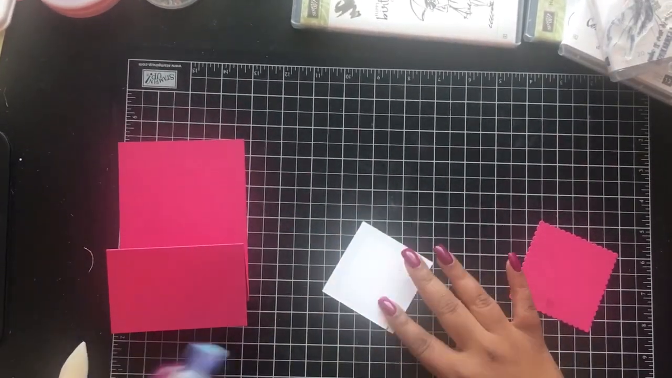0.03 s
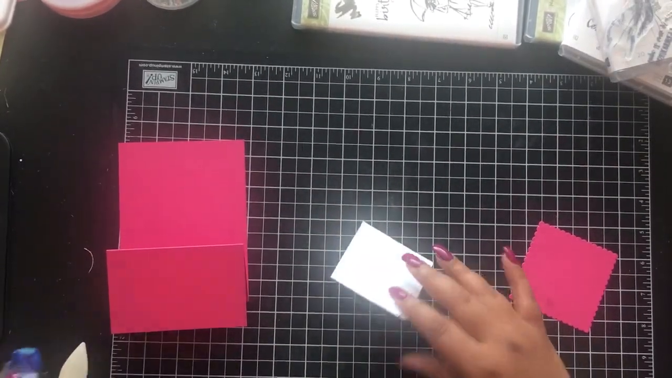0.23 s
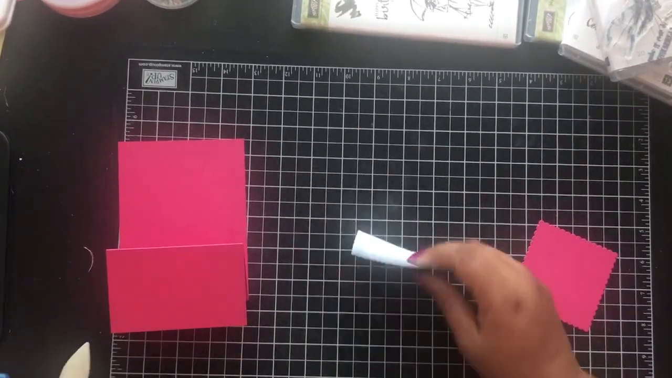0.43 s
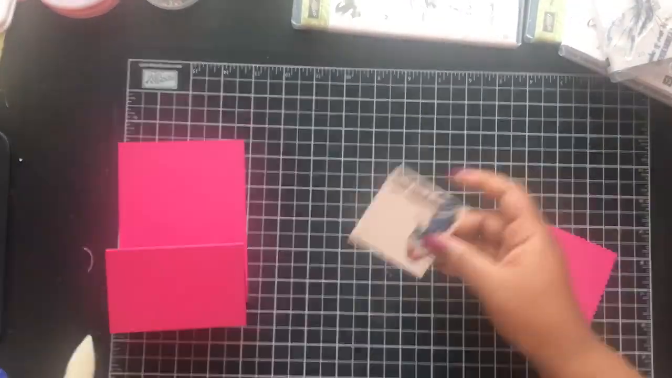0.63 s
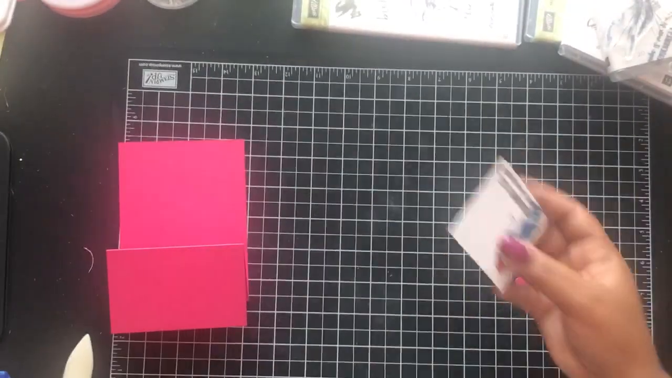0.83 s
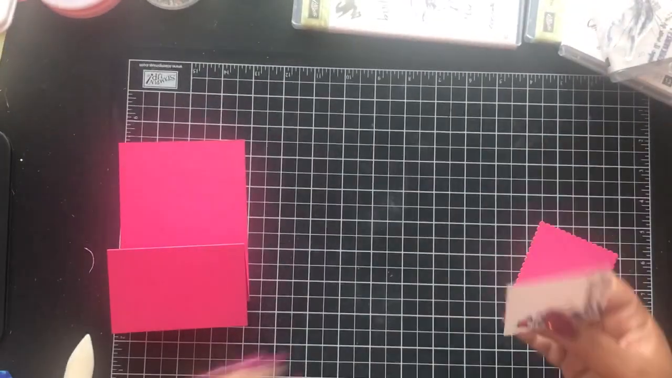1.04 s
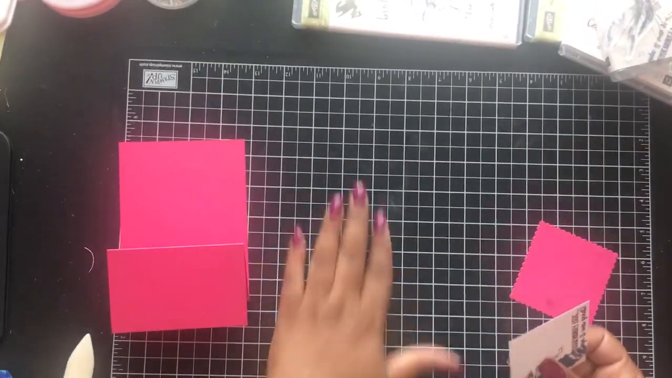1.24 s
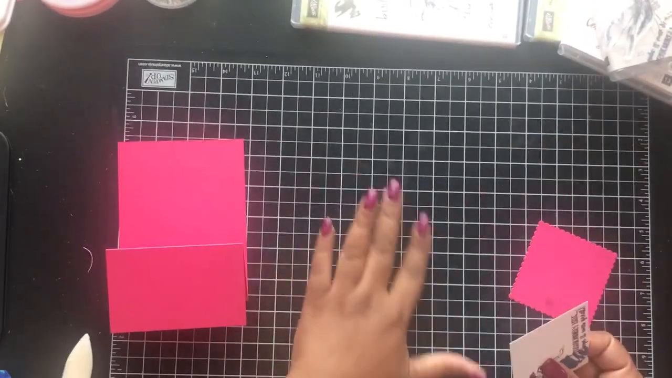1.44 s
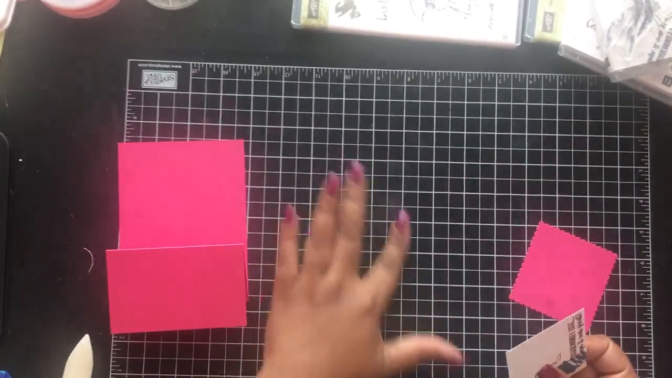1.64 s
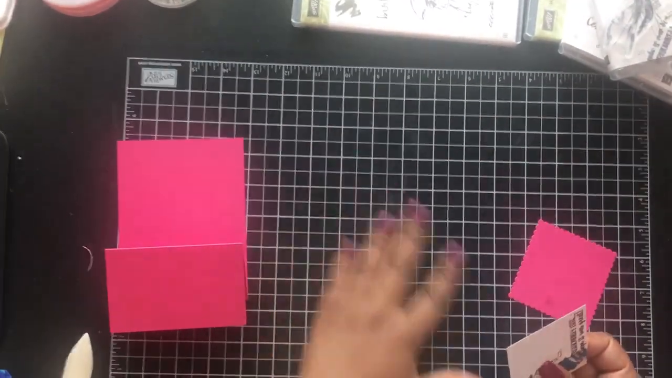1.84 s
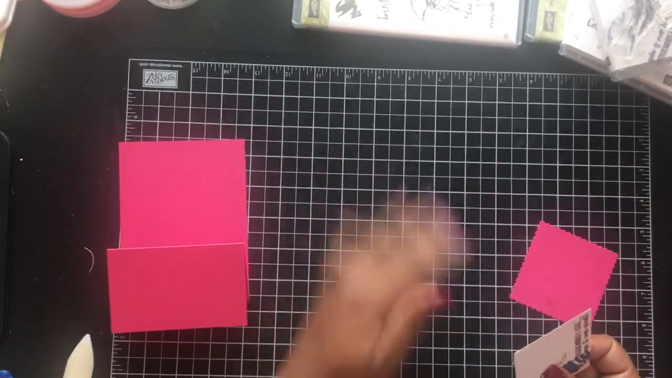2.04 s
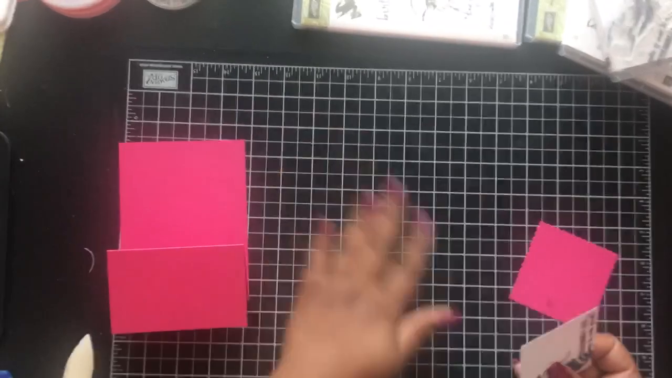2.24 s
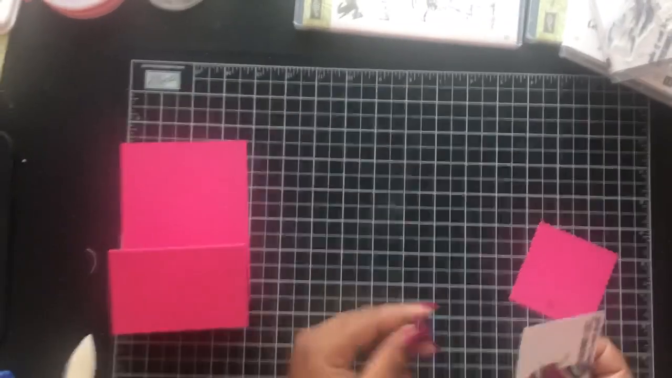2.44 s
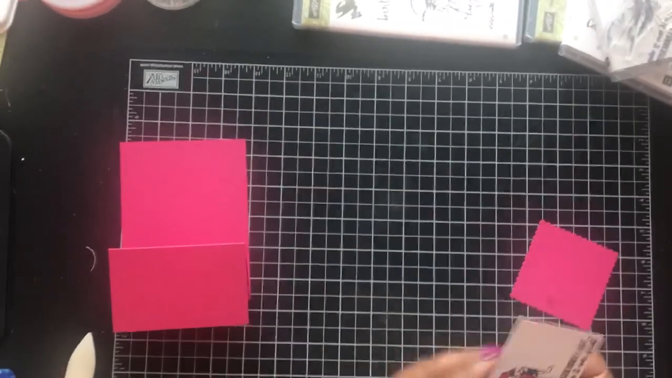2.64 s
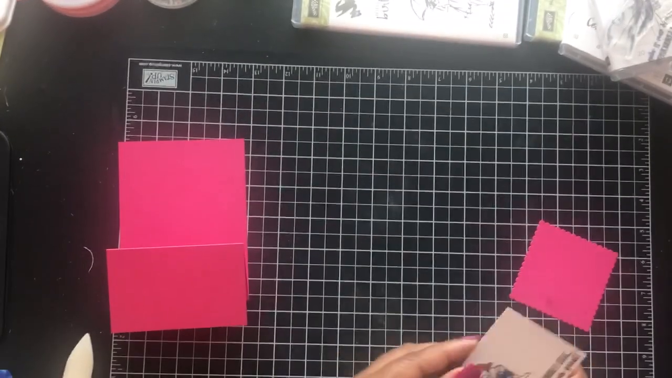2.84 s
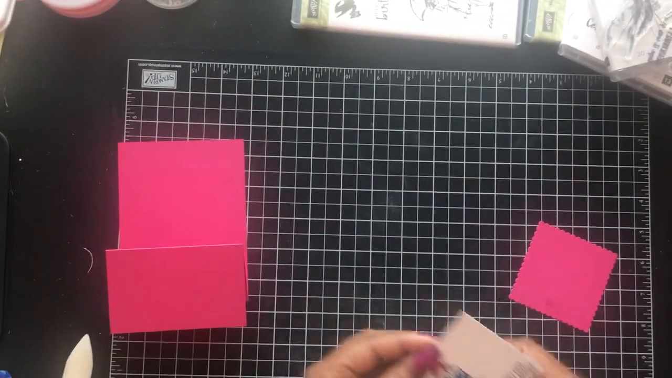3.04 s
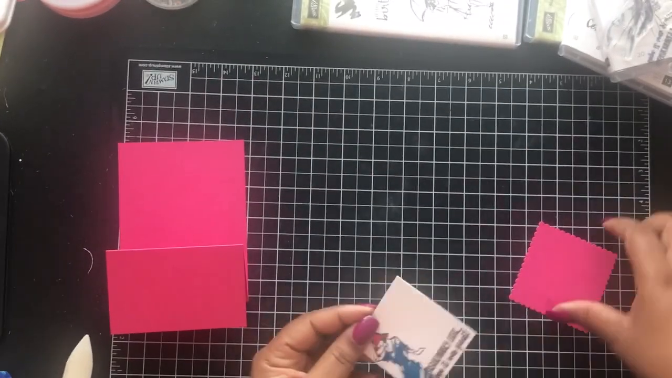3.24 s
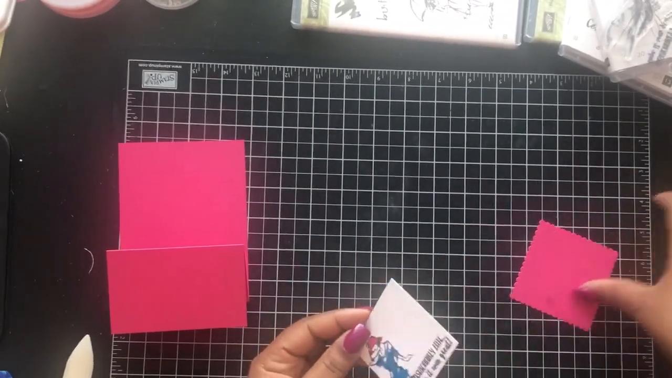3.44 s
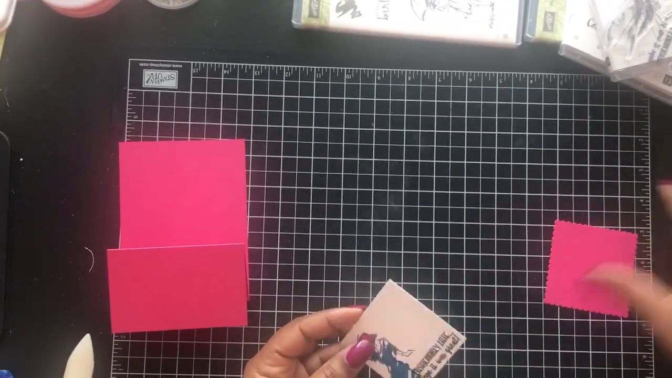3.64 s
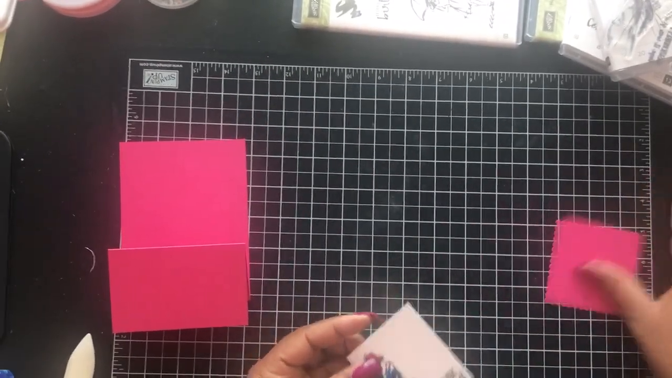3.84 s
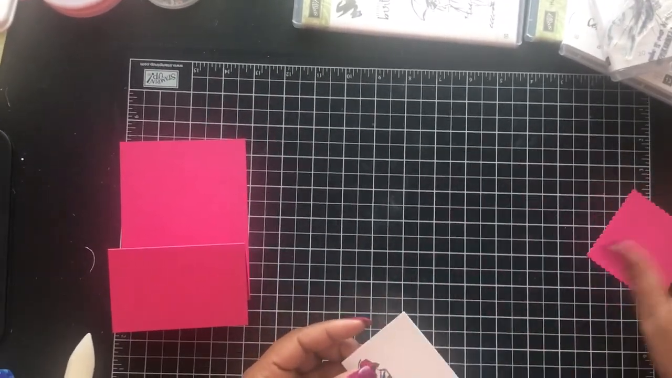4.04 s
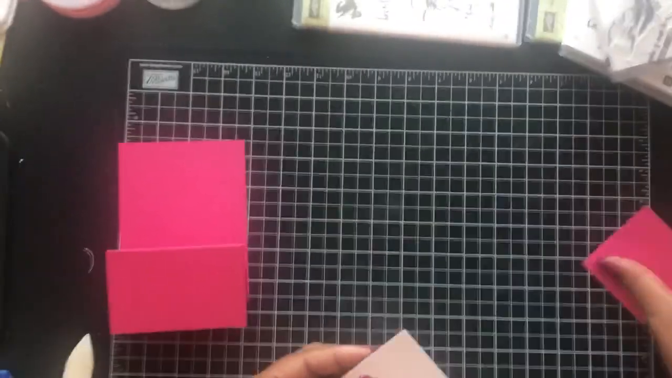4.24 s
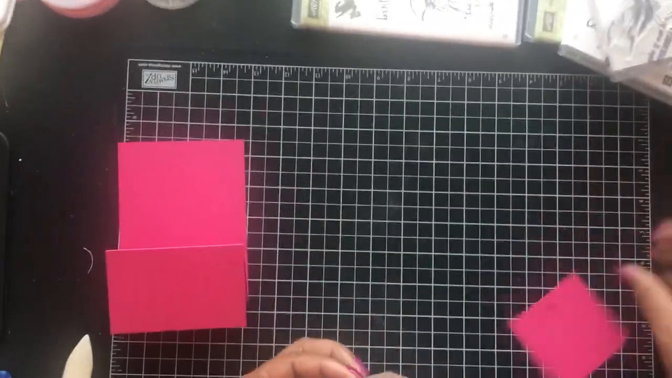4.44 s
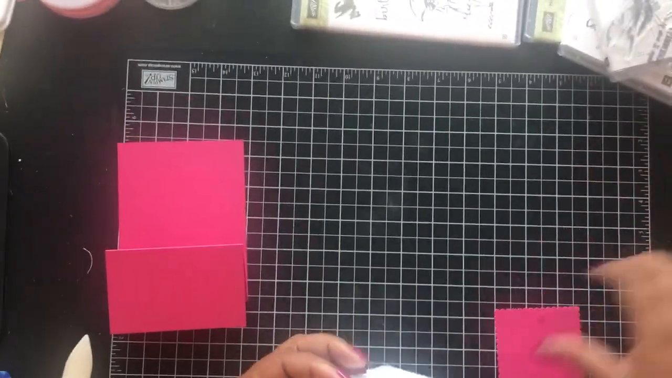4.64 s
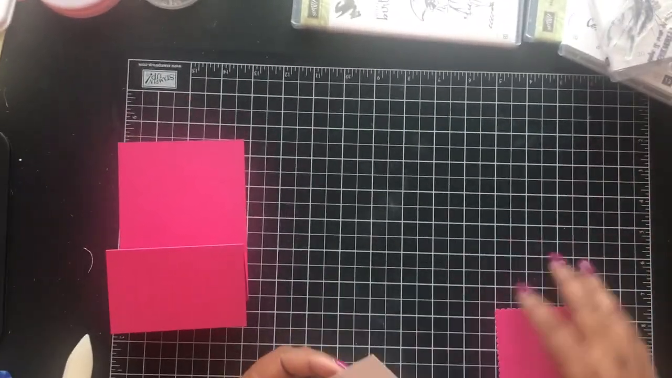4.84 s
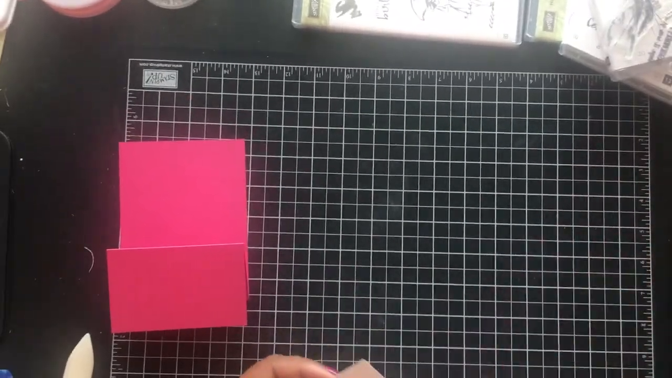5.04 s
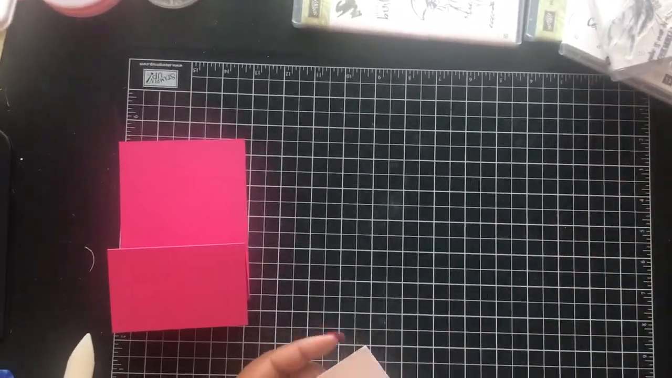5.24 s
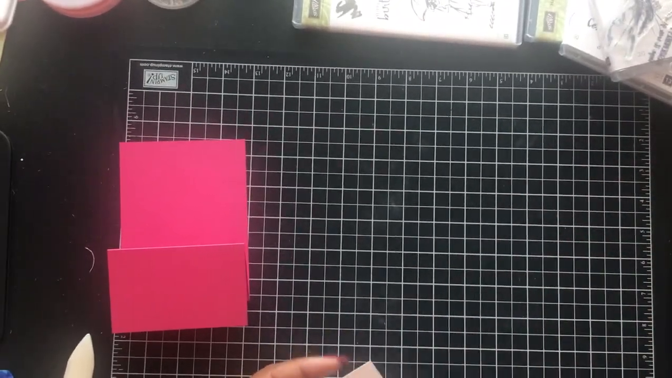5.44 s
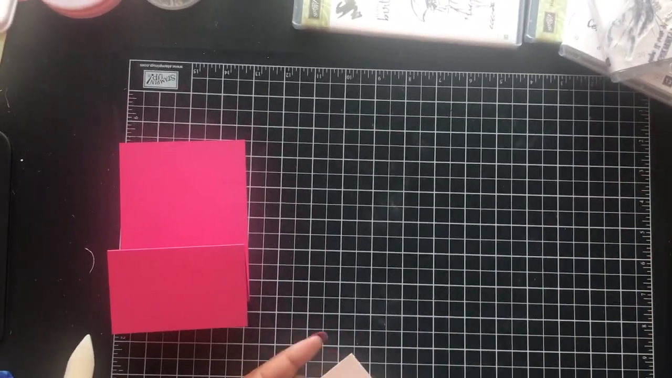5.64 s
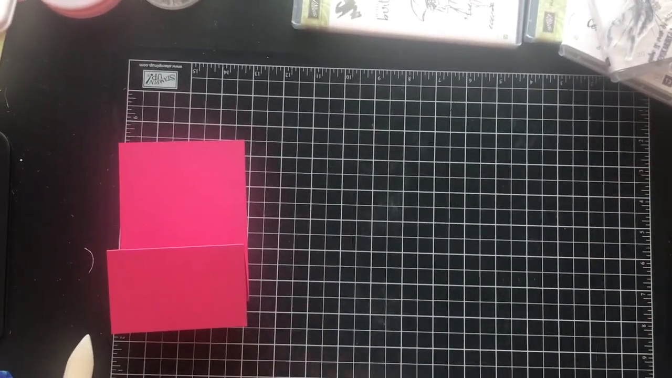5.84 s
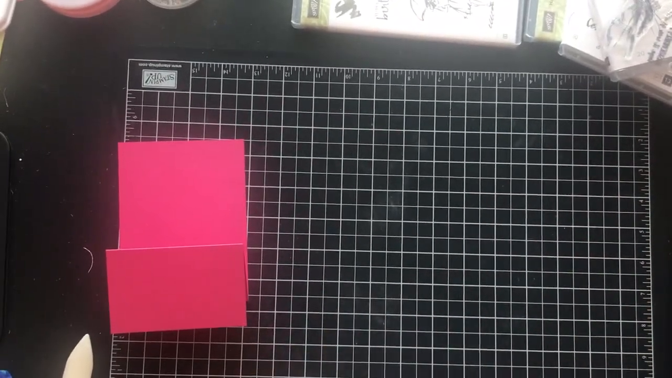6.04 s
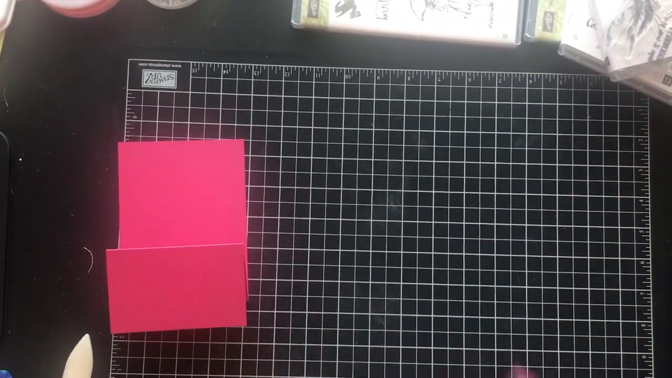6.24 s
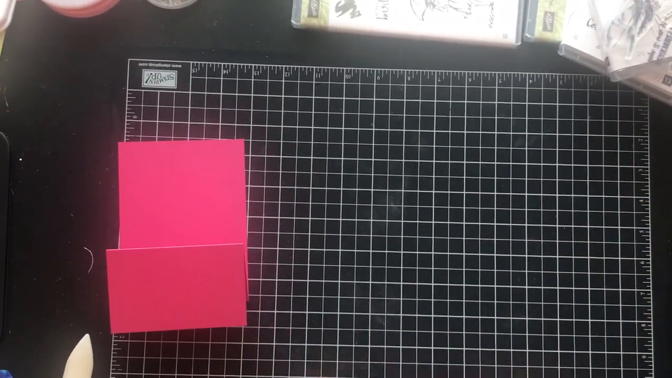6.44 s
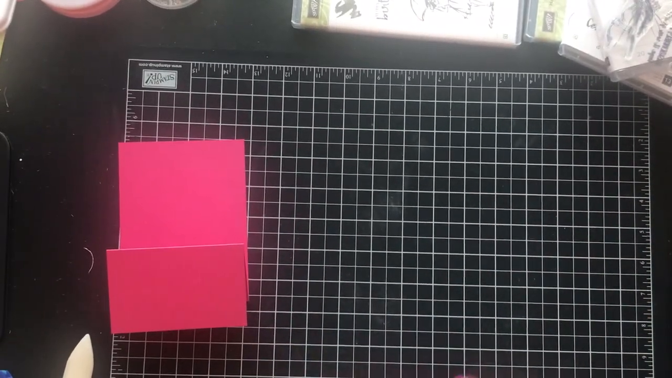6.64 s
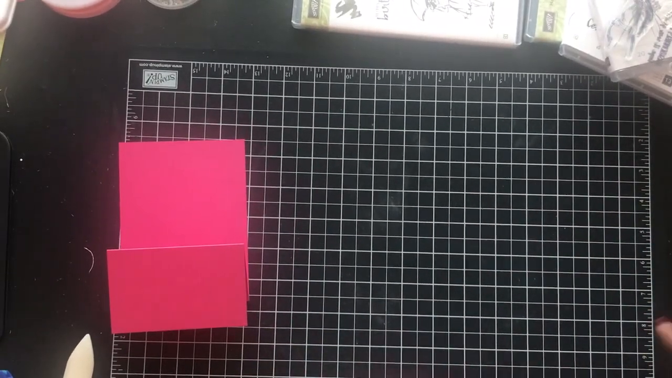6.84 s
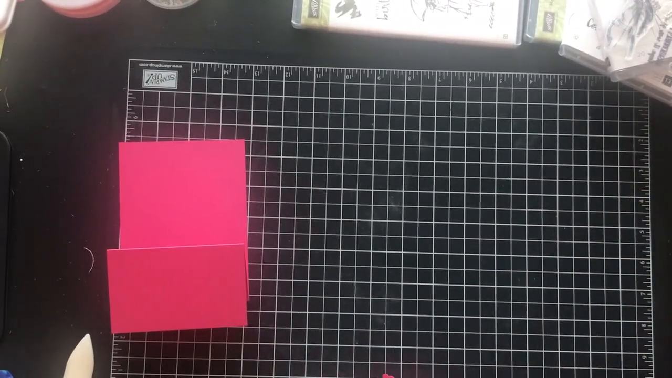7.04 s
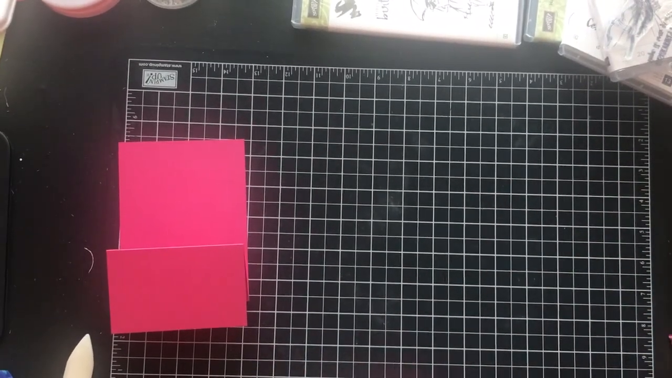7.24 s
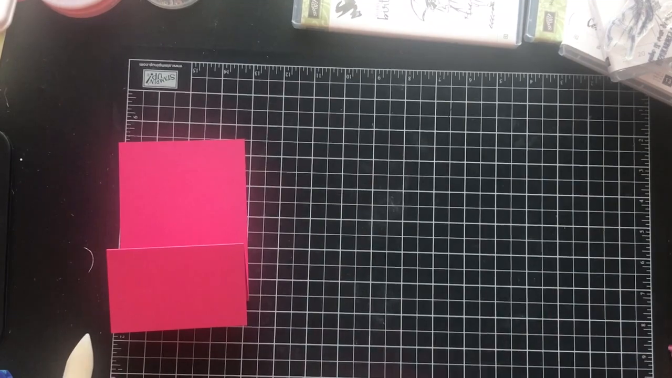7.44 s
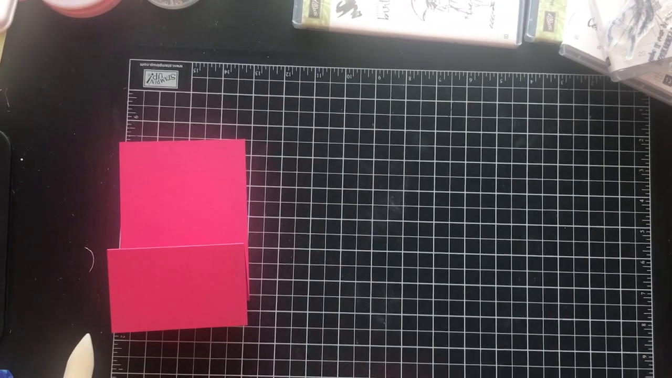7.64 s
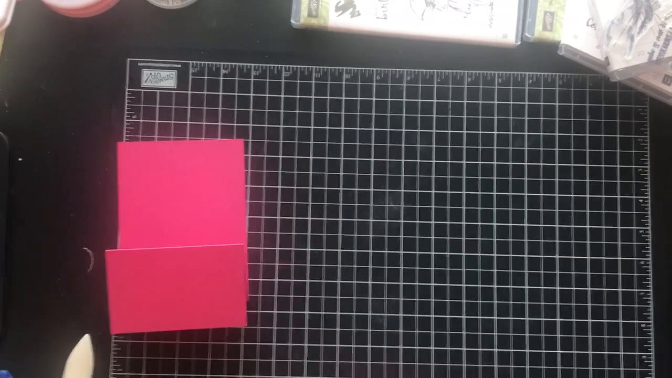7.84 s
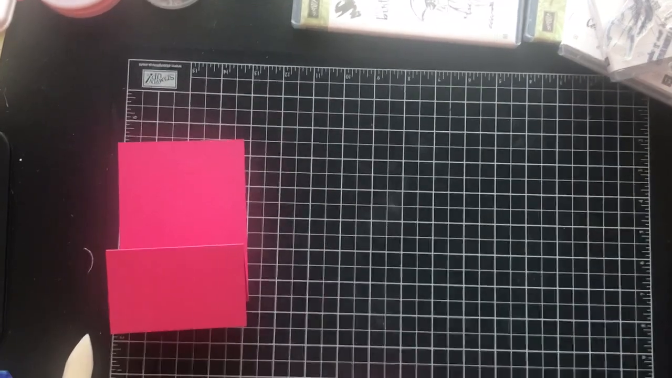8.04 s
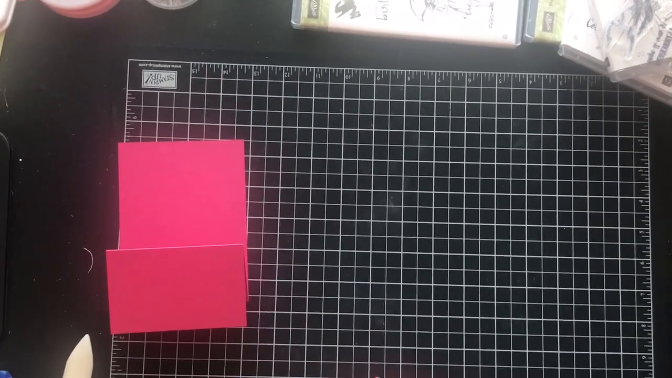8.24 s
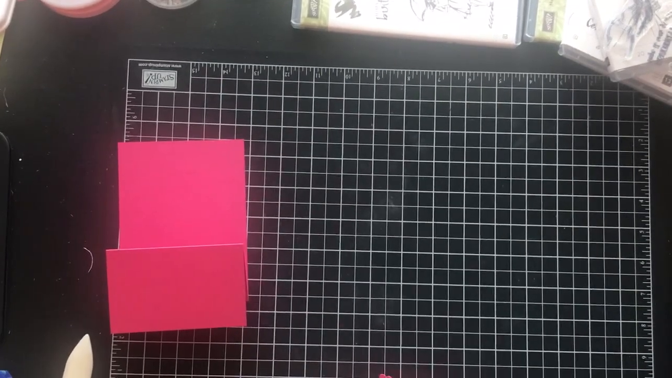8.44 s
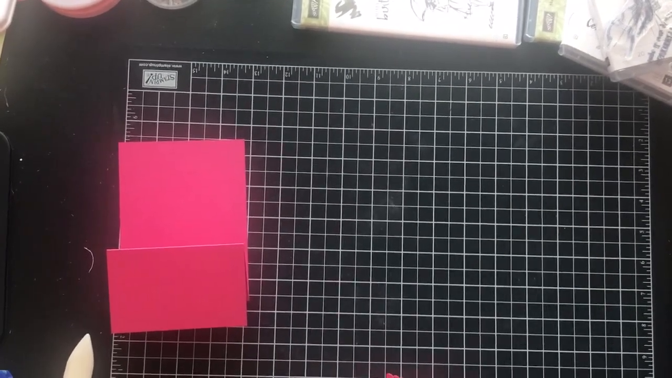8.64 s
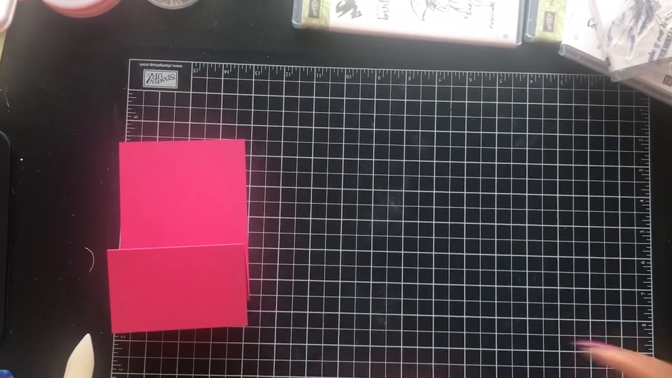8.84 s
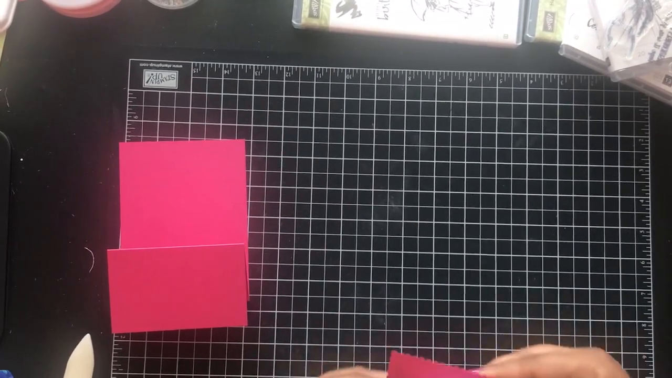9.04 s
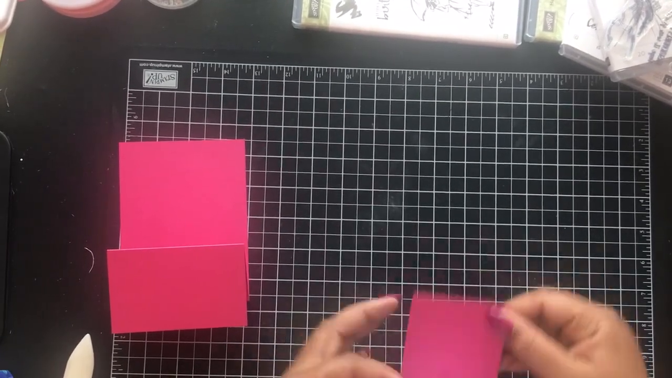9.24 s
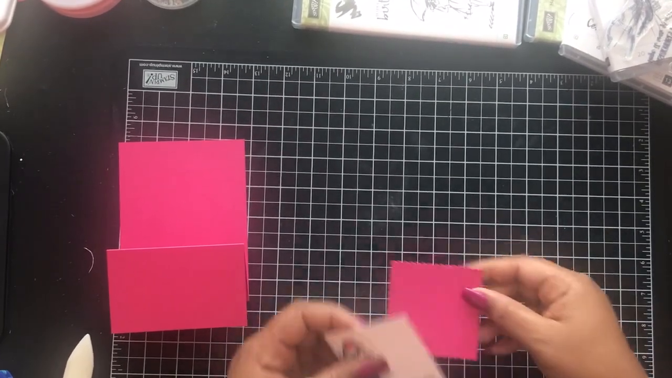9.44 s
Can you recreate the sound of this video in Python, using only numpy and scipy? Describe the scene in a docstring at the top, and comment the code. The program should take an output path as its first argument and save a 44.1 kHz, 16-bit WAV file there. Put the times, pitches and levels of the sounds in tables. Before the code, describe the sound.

Close tabletop papercraft: sharp clacks of an acrylic block, soft palm swishes, card scrapes and nail ticks, short adhesive rasps, then near quiet.

```python
"""A desk in a small room, cards being made, heard from a microphone above the cutting mat.
A clear acrylic block knocks and rattles on the desk: noisy contacts crack and a bank of modes rings.
Long nails tick on cardstock, hands land softly and sweep the mat, card slides, scrapes and chatters,
and a tape runner rasps: filtered trains of tiny slips that grow with the hand's speed.
Behind it lie short reflections, steady room noise and a fan's faint hum."""
import sys
import numpy as np
from scipy import signal
from scipy.fft import rfft, irfft
from scipy.io import wavfile
from scipy.ndimage import uniform_filter1d

SR = 44100
rng = np.random.default_rng(int(sys.argv[2]) if len(sys.argv) > 2 else 0)


def int16_out(signal):
    """Quantize to a 16-bit WAV file."""
    q = np.round(np.clip(np.atleast_2d(signal).T, -1, 1) * 32767)
    wavfile.write(sys.argv[1], SR, q.astype(np.int16))


N = 418950
TIME = np.arange(N) / SR
EDGE_HZ = 16000  # upper band limit
SPEED_POWER = 1.23  # the force of friction grows as this power of the hand's speed


def amp(db):
    """Decibels to gain."""
    return 10 ** (np.asarray(db) / 20)


def evened(x):
    """Scales to rms 1."""
    return x / np.sqrt(np.mean(x ** 2) + 1e-20)


def read(points, hz):
    """Reads a table on a log-frequency axis."""
    f, value = np.transpose(points)
    return np.interp(np.log(hz + 1), np.log(f + 1), value)


def add(mix, s, sound):
    """Adds a sound to the mix at time s."""
    part = mix[max(round(s * SR), 0):][:len(sound)]
    part += sound[:len(part)]


def colour(x, points, tilt_db=0, size=2048):
    """Causal filter of unit energy with the given spectrum, tilted per octave about 3 kHz."""
    hz = abs(np.fft.fftfreq(size, 1 / SR))
    tilt = tilt_db * np.log2((hz + 200) / 3000)
    log_gain = np.log(amp(read(points, hz) + tilt))
    minimum_phase = np.exp(np.conj(signal.hilbert(log_gain)))
    taps = np.fft.ifft(minimum_phase).real[:size // 2]
    return signal.oaconvolve(x, taps / np.linalg.norm(taps))[:len(x)]


def burst(envelope):
    """A contact: a spray of tiny breaks with an even spectrum and the energy of 3 ms at level 1."""
    z = rfft(rng.standard_normal(len(envelope)) * envelope)
    x = irfft(z / (abs(z) + 1e-12), len(envelope))
    x *= np.sqrt(np.maximum.accumulate(envelope[::-1])[::-1])  # it dies away with its envelope
    return x / np.linalg.norm(x) * np.sqrt(.003 * SR)


def friction(count, per_s, spread_db, smooth):
    """Fibres catch and let go: tiny slips of uneven size over a smooth hiss."""
    happens = rng.random(count) < per_s / SR
    size = amp(spread_db * np.minimum(rng.exponential(1, count), 5))
    slips = happens * rng.choice([-1, 1], count) * size
    return evened(evened(slips) + smooth * rng.standard_normal(count))


def stick_slip(per_s, depth_db):
    """The grip tightens and slackens at random."""
    wander = uniform_filter1d(rng.standard_normal(N), int(SR / per_s))
    wander = evened(uniform_filter1d(wander, 60))
    return evened(amp(depth_db * wander))


# The acrylic block knocks on the desk below the microphone. Each row: start in seconds, ring in dB
# and crack in dB (both before trim), hardness in dB per octave, bandwidth of the contact in Hz.
KNOCKS = [(.4520, -54, -38, -5, 9050), (0.4533, -41.5, -22, 0.95, 18070), (0.698, -21.5, -11, -0.5, 17840),
          (0.7091, -35, -28, 2, 12000), (0.7184, -36, -26, -3, 8000)]
# Modes of the block lying on the desk. Each row: frequency in Hz, level in dB re the ring before
# the hardness tilt, time to fall 60 dB in seconds.
BLOCK_MODES = [(330, -2, .11), (668, -11, .1), (908, -8, .08), (1222, -5, .11), (1302, 1, .11),
               (1513, 2, .13), (1545, -3, .11), (1618, 1, .13), (1721, -3, .11), (1836, -5, .11),
               (3390, -6, .09), (3626, -7, .07), (3915, -7, .07), (4090, -8, .07), (4745, -11, .07),
               (5000, -12, .09), (5793, -13, .09), (8606, -9, .1)]
# Spectrum of the crack at the contact. Each row: frequency in Hz, level in dB before the tilt.
CRACK = [(100, -21), (230, -11.5), (350, -1), (520, -9.5), (900, -4), (1450, -1.5), (2200, -4.5),
         (2650, -5), (3150, 0.5), (3700, 0), (5500, -6), (7300, -5.5), (8600, -1.5), (10500, -8.5),
         (15000, -10.5)]


def block(ring_db=-4.5, crack_db=1, rattle_db=-6, rattle_s=0.0061):
    """Each knock is a contact and a dying rattle against the desk, then the block rings."""
    out, t = np.zeros(N), TIME[:SR // 5]
    for s, ring, crack, hardness_db, band_hz in [*KNOCKS, *chatter()]:
        modes = 0
        for hz, db, t60 in BLOCK_MODES:
            decay = amp(db + hardness_db * np.log2(hz / 1500) - 60 * t / t60)
            modes = modes + decay * np.sin(2 * np.pi * (hz * t + rng.random()))
        scuff = amp(rattle_db) * EDGE_HZ / band_hz  # softer contacts scuff instead of snapping
        snap = burst(t * np.exp(-t / 0.00058))
        rattle = burst(t * np.exp(-t / rattle_s))
        force = (snap + scuff * rattle) / np.sqrt(1 + scuff)
        knock = amp(ring + ring_db) * modes * (1 - np.exp(-t / .0008))
        knock += amp(crack + crack_db) * colour(force, CRACK, hardness_db)
        lowpass = signal.butter(2, min(band_hz, .45 * SR), fs=SR)  # a soft contact has little treble
        add(out, s, signal.lfilter(*lowpass, knock))
    return out


# The block chatters softly on the desk as the fingers grip it. Each row: start in seconds, length
# in seconds, gap between contacts in seconds, crack in dB before trim, its change in dB per second.
RATTLES = [(.545, .028, .008, -37.5, -120), (.6435, .026, .007, -32, -480), (.678, .018, .012, -44, 350)]
# ring re crack before their trims, tilt per octave, bandwidth of the contact
RATTLE_RING_DB, RATTLE_HARDNESS_DB, RATTLE_BAND_HZ = -14, -1.5, 3200


def chatter():
    """Each rattle is a quick run of soft knocks, written as rows like those of the knocks."""
    rows = []
    for s, length, gap, db, slope in RATTLES:
        for t in np.arange(0, length, gap):
            crack = db + slope * t
            rows.append((s + t, crack + RATTLE_RING_DB, crack, RATTLE_HARDNESS_DB, RATTLE_BAND_HZ))
    return rows


# The three voices of card rubbed close to the microphone: the rasp, the flexing sheet and the
# fibre hiss. Each row: frequency in Hz, level in dB.
RASP = [(700, -35), (1800, -0.5), (2350, 3), (3000, 5), (4500, 3.5), (6300, 2), (8000, -4.5), (10000, -9.5),
        (15000, -60.5)]
BODY = [(80, -37), (200, -0.5), (400, -2), (800, 0), (1050, -2), (1550, -3.5), (1900, -6.5), (2600, -31.5)]
HISS = [(3000, -32), (6000, -9), (8600, 1), (10000, 2), (12000, -3.5), (14000, -4), (16000, -4)]


def card(drive, body_db, hiss_db, voice=RASP):
    """A force on a sheet sounds as a rasp, the flexing sheet below it and fibre hiss above."""
    rasp = colour(drive, voice)
    body = colour(np.roll(drive, shift=11), BODY)  # a quarter of a millisecond later
    return rasp + amp(body_db) * body + amp(hiss_db) * colour(drive, HISS)


# Nails and card edges tick above the mat. Each row: start in seconds, snap in dB before trim,
# sheet body in dB re snap, fibre hiss in dB re snap, pitch of the struck patch of card in Hz.
TICKS = [(0.0677, -55, 1, 14, 9500), (0.265, -56, -1, -13, 4400), (0.643, -50, -6, -1, 3300),
         (1.05, -50.5, -5, -3, 3120), (1.295, -35.5, -4.5, -8.5, 3700), (2.0566, -40.5, -2, -17, 4530),
         (2.5615, -41, -4, -0.5, 3700), (2.7211, -48.5, 3.5, -28.5, 2540), (3.3278, -55, -3, -12, 3020),
         (3.6382, -48, -11, -11, 3100), (3.8416, -55.5, -13, 6, 4500), (3.8694, -42, -14, -6, 4100),
         (3.8887, -42, -13, -21, 4120), (4.1523, -53.5, 2, -21, 3290), (4.1738, -38, -2.5, -12, 1190),
         (4.2544, -45, -15, -1, 1400), (4.3, -46, 0, 1, 3600), (4.954, -47, -22, -14, 3150),
         (4.9716, -47, -19, -8, 3200), (5.2225, -42, -10, -12, 4290), (5.254, -50.5, -18, 10, 5500),
         (5.4787, -49, -12, -14, 6770), (5.4984, -49, -5, -17, 7800), (5.7774, -50.5, -5, -4, 4500),
         (5.8149, -40, -22, -6, 1030), (5.977, -40.5, -1.5, -6.5, 990), (6.2182, -45.5, -3.5, -3, 1330),
         (6.2297, -45.5, -22, -18, 3820), (6.3093, -43.5, 2, -13, 2410), (6.7098, -48.5, -17, -14, 4200),
         (6.7342, -45, -11, -10, 6210), (6.766, -49.5, 0, 3, 3970), (6.7765, -51, -12, -12, 4300),
         (7.0302, -51.5, -6, -6, 1250), (7.176, -47.5, -12, -7, 3960), (9.1529, -55.5, -14, -1.5, 5500),
         (9.2, -52, -14, -9, 3200), (9.245, -53.5, -17, -5, 6040), (9.3407, -54, -14, -20, 3780),
         (9.449, -45, -10, -2, 1680), (9.462, -39.5, -14, -8, 1060)]


def ticks(level_db=-1, flutter_db=-7, patch_db=-3, patch_q=5, patch_s=0.0022):
    """Nails and edges snap on the card, which flutters for milliseconds and rings its struck patch."""
    out, t = np.zeros(N), TIME[:4096]
    for s, db, body_db, hiss_db, hz in TICKS:
        force = burst(np.exp(-t / 0.00073)) + amp(flutter_db) * burst(t * np.exp(-t / 0.0016))
        patch = signal.lfilter(*signal.iirpeak(hz, patch_q, SR), burst(np.exp(-t / patch_s)))
        patch *= amp(patch_db) * np.linalg.norm(force) / np.linalg.norm(patch)
        add(out, s, amp(db + level_db) * (card(force, body_db, hiss_db) + patch))
    return out


# Hands and card land softly on the mat. Each row: start in seconds, level in dB before trim,
# pitch of the thud in Hz.
THUDS = [(0.065, -50.5, 228), (0.455, -38.5, 265), (0.699, -39.5, 220), (1.295, -48, 260),
         (1.335, -49.5, 91.1), (1.902, -48.5, 112), (2.033, -44.5, 285), (2.058, -41.5, 170),
         (2.224, -40, 114), (2.498, -51, 177.5), (3.351, -44, 191), (3.495, -48.5, 260), (3.842, -49, 200),
         (3.882, -41, 335), (4.176, -39, 153), (4.187, -38, 150), (5.050, -53, 149), (5.404, -42.5, 260),
         (5.424, -45, 202), (5.835, -45.5, 490), (5.977, -47.5, 800), (7.028, -55, 219),
         (7.752, -50, 254.6), (9.453, -42.5, 454)]


def thuds(level_db=2, cycles=1.6):
    """A soft, uneven push lasting a few swings excites the desk's crowded low modes."""
    out, t = np.zeros(N), TIME[:SR // 5]
    for s, db, hz in THUDS:
        envelope = np.exp(-t * hz / cycles / 2) * (1 - np.exp(-t / 0.00099))
        push = rng.standard_normal(len(t)) * envelope
        desk = [(hz / 3, -14), (hz * 0.53, -3), (hz, 0), (hz * 1.5, -4), (hz * 3, -22), (hz * 12, -60)]
        thud = colour(push, desk)
        thud *= np.sqrt(0.0079 * SR) / np.linalg.norm(thud)  # energy of 7.9 ms at level 1
        add(out, s, amp(db + level_db) * thud)
    return out


def rubbing(strokes, voices, slips):
    """In each stroke the hand speeds up and slows to rest; friction feeds every voice with its speed."""
    forces = np.zeros((len(voices), N))
    for s, rise, fall, db, body_db, hiss_db in strokes:
        t = TIME[:int((rise + fall) * SR)]
        speed = np.sin(np.pi / 2 * np.interp(t, [0, rise, rise + fall], [0, 1, 0]))
        for force, share_db in zip(forces, (0, body_db, hiss_db)):
            add(force, s, amp(db + share_db) * speed ** SPEED_POWER)
    out = np.zeros(N)
    for force, voice in zip(forces, voices):
        signs = rng.choice([-1, 1], N)  # the voices share only the size of each slip
        out += colour(force * slips * signs, voice)
    return out


# Card slides over the mat and through the fingers, one row a push. Each row: start in seconds,
# speeding up in seconds, slowing down in seconds, rasp in dB before trim, sheet body in dB re rasp,
# fibre hiss in dB re rasp.
SLIDES = [(.80, 0.046, 0.2, -61.5, -1, -4), (.98, .07, 0.064, -60, -1, -1.5),
          (2.74, 0.12, 0.094, -64.5, 4, -18), (2.93, 0.027, .13, -63.5, 0, -3.5),
          (3.33, 0.083, 0.11, -67, 7.5, -9), (3.47, 0.06, .08, -60.5, 4, 1),
          (3.56, 0.043, 0.047, -54, -8, 6.5), (3.86, .06, 0.26, -58.5, -3, -7),
          (3.922, 0.032, 0.065, -51.5, -3, 7.5), (4.172, .015, .05, -48, -2, -10),
          (4.42, .11, .13, -62, -12, 4.5), (4.74, 0.013, 0.076, -58.5, -3, -5),
          (4.955, 0.023, 0.068, -52, -3.5, -4), (4.98, 0.09, 0.061, -49.5, -11, 4),
          (5.08, 0.079, 0.09, -46.5, -4, -9), (5.21, 0.034, 0.097, -57.5, 3, -2),
          (5.28, 0.086, 0.11, -61.5, 5, -15), (5.98, 0.037, 0.06, -54, -9, -0.5),
          (6.23, .055, .045, -54.5, -9, 2), (6.33, 0.093, .13, -61.5, -10, 0),
          (6.445, 0.021, 0.05, -53.5, -4, -9), (6.61, .13, .07, -62.5, -2, -6),
          (7.71, 0.036, 0.018, -56.5, 5, -6), (8.17, .22, 0.17, -72.5, -3, -0.5),
          (8.53, 0.036, 0.036, -75, -3, 6), (8.86, 0.038, 0.062, -78, -6, 9.5),
          (9.12, 0.11, 0.19, -70, -2.5, -6), (9.33, 0.016, 0.042, -59.5, -6, -10)]


def slides(level_db=-1):
    """Card glides with a fine, dense grain and small catches."""
    grain = friction(N, 2000, 2.96, 0.88) * stick_slip(146, 1.8)
    return amp(level_db) * rubbing(SLIDES, (RASP, BODY, HISS), grain + catches())


def catches(per_s=14, size_db=1, spread_db=1.5, snap_s=0.00082):
    """Now and then a moving edge snags and lets go with a tiny snap."""
    snags = (rng.random(N) < per_s / SR) * amp(size_db + spread_db * rng.standard_normal(N))
    return signal.oaconvolve(snags, burst(np.exp(-TIME[:512] / snap_s)))[:N]


# A card edge scrapes across the mat. Each row: start in seconds, rise in seconds, fall time constant
# in seconds, rasp in dB, sheet body in dB re rasp, fibre hiss in dB re rasp.
SCRAPES = [(3.868, 0.021, 0.02, -48, 0, -8), (4.195, 0.036, 0.02, -34, -2.5, -23),
           (4.293, 0.013, 0.044, -45.5, -5.5, -8), (4.348, 0.027, 0.023, -31.5, -9, -15),
           (7.177, 0.0099, 0.013, -49.5, -7, -13), (9.444, 0.018, 0.0086, -51, 5, -9)]
# Nails flick off the mat at the end of a sweep. Each row: start in seconds, rise in seconds, fall
# time constant in seconds, swish in dB, mat body in dB re swish, fibre hiss in dB re swish.
FLICKS = [(1.987, 0.0058, 0.014, -35, -29, -10), (2.368, 0.0071, 0.025, -36, -37, -27),
          (2.408, 0.0043, 0.0068, -28, -47, -10), (2.429, 0.0026, 0.0051, -36, -17, -22)]


def scrapes(rows, voice):
    """An edge speeds up across the surface and slips off."""
    out, t = np.zeros(N), TIME[:SR // 4]
    for s, rise, fall, db, body_db, hiss_db in rows:
        speed = np.sin(np.pi / 2 * np.minimum(t / rise, 1)) ** 2
        speed *= np.exp(-np.maximum(t - rise, 0) / fall)
        force = speed * friction(len(t), 7000, 0.86, 0.87)
        add(out, s, amp(db) * card(force, body_db, hiss_db, voice))
    return out


# Skin and nails brushing the mat. Each row: frequency in Hz, level in dB.
SKIN = [(500, -31), (2300, -8), (3500, -0.5), (4500, 0), (5800, -1.5), (7500, -5), (9500, -4), (15000, -13)]
# The palm sweeps the mat. Each row: start in seconds, speeding up in seconds, slowing down in
# seconds, swish in dB before trim, mat body in dB re swish, fibre hiss in dB re swish.
SWEEPS = [(1.33, 0.13, .18, -67.5, 1, 2), (1.65, 0.043, 0.097, -72, 8, 8.5), (1.83, .07, .06, -65, -2, 5),
          (1.90, 0.073, .045, -48.5, -14, -2), (2.22, 0.026, 0.068, -59, 1, -17),
          (2.255, .06, .13, -47.5, -10, -21)]


def sweeps(level_db=-1):
    """The palm glides over the mat with a smooth swish."""
    return amp(level_db) * rubbing(SWEEPS, (SKIN, BODY, HISS), friction(N, 8000, 3.5, 1.9))


# The tape runner's plastic shell. Each row: frequency in Hz, level in dB.
CASE = [(150, -8), (350, -2), (550, -1.5), (1000, -5), (1500, -0.5), (1850, -8), (2500, -28)]
# The tape runner's short strokes over the card. Each row: start in seconds, speeding up in seconds,
# slowing down in seconds, rasp in dB before trim, case in dB re rasp, hiss of peeling glue in dB re rasp.
RUNNER = [(5.445, 0.038, 0.054, -50, -1, 0), (5.495, 0.033, 0.17, -53, 4.5, 3),
          (5.65, 0.017, .11, -50.5, -6, -8), (5.795, 0.021, .05, -51, 1, -11)]


def runner(level_db=-1):
    """Glue tears off the tape in coarser grains that shake the plastic shell."""
    tearing = friction(N, 1800, 3.6, .7)
    return amp(level_db) * rubbing(RUNNER, (RASP, CASE, HISS), tearing * stick_slip(210, 1.4))


# An edge chatters in a narrow band that glides as the free length of card changes. Each row: start
# in seconds, length in seconds, start in Hz, end in Hz, level in dB before its fades.
GLIDES = [(2.403, 0.026, 6100, 5800, -31), (4.214, 0.041, 735, 880, -40), (4.218, 0.041, 1540, 1600, -37),
          (4.22, 0.036, 2480, 2880, -43.5), (5.086, .06, 5600, 4200, -50.5),
          (5.107, 0.092, 3860, 2730, -51), (5.221, 0.06, 4670, 5560, -50.5), (5.479, .028, 6500, 7600, -46),
          (5.504, 0.1, 1550, 1450, -59), (5.601, 0.08, 5160, 4460, -54.5), (5.655, 0.067, 3080, 2470, -51),
          (5.659, 0.082, 1620, 1510, -50.5), (6.299, 0.026, 2900, 2500, -51),
          (6.731, 0.061, 4170, 4180, -62), (9.439, 0.028, 1810, 1800, -52.5)]


def glides(width_share=0.29):
    """Slips ring one moving resonance of the card."""
    out = np.zeros(N)
    for s, length, start_hz, end_hz, db in GLIDES:
        count = int(length * SR)
        turn = np.exp(2j * np.pi * np.cumsum(np.geomspace(start_hz, end_hz, count)) / SR)
        smooth = signal.butter(2, width_share * start_hz / 2, fs=SR)
        # shift the gliding pitch down to 0 Hz, low-pass, and shift it back
        slow = signal.lfilter(*smooth, friction(count, 820, 3.3, 0.44) / turn)
        ring = (turn * slow).real
        add(out, s, amp(db) * evened(ring) * signal.windows.tukey(count, .6))
    return out


# The small room's decay. Each row: frequency in Hz, time to fall 60 dB in seconds.
ROOM = [(150, 0.27), (400, 0.44), (1000, 0.21), (2800, .24), (7300, .22), (15000, .16)]


def room(x, wet_db, count=3):
    """Dense reflections, each band dying at its own speed; their pattern cycles as if hands moved."""
    wet = np.zeros(N)
    for k in range(count):
        taps = rng.choice([-1., 1.], SR // 2) * (rng.random(SR // 2) < 5000 / SR)
        hz, t, z = signal.stft(taps, SR, nperseg=256)
        decay = amp(-60 * t / read(ROOM, hz)[:, None])
        tail = signal.istft(z * decay, SR, nperseg=256)[1]
        tail[:int(.002 * SR)] = 0  # no reflection in the first 2 ms
        share = np.cos(np.pi * (4 * TIME + k / count)) * np.sqrt(2 / count)
        wet += signal.oaconvolve(x * share, tail / np.linalg.norm(tail))[:N]
    return (x + amp(wet_db) * wet) / np.hypot(1, amp(wet_db))


# Shape of the room air behind the desk. Each row: frequency in Hz, relative density in dB.
AIR = [(15, -38), (25, -11), (53, -4.5), (117, -7), (175, -4.5), (293, -14), (427, -10), (463, -11.5),
       (545, -8.5), (607, -17), (962, -15), (1260, -18.5), (1610, -17.5), (3520, -30), (16000, -47)]
# The fan's broad hums in the background. Each row: frequency in Hz, width at half amplitude in Hz,
# level in dB.
FAN = [(56, 14, -69), (346.7, 8.3, -70.5), (430, 19, -72.5), (657, 30, -72), (845, 28, -71)]


def air(air_db=-58):
    """Steady room noise with the narrow hums of a fan, all shaped from random noise."""
    hz = np.fft.rfftfreq(N, 1 / SR)
    shapes = [(air_db, amp(read(AIR, hz)))]
    for f, width, db in FAN:
        shapes.append((db, 1 / (1 + (2 * (hz - f) / width) ** 2)))
    out = np.zeros(N)
    for db, shape in shapes:
        out += amp(db) * evened(irfft(rfft(rng.standard_normal(N)) * shape, N))
    return out


def scene():
    """All the handling sounds in the room, over its steady air."""
    rubs = slides() + scrapes(SCRAPES, RASP) + scrapes(FLICKS, SKIN) + sweeps() + runner() + glides()
    handling = room(block(), -3.0) + room(ticks(), -3.5) + room(rubs + thuds(), -6.5)
    return (handling + air())[None]


# The microphone above the mat, with a bass cut and a notch from its port. Each row: frequency in Hz,
# gain in dB.
MICROPHONE = [(15, -33.5), (28, -12.5), (48, -3), (9300, -2), (10000, -3.5), (10500, -6.5), (11300, 1.5),
              (14000, 2), (16000, -2)]


def record(dry):
    """The microphone's colour, then the band limit."""
    hz = np.fft.rfftfreq(N, 1 / SR)
    heard = irfft(rfft(dry) * amp(read(MICROPHONE, hz)), N)
    lowpass = signal.firwin(401, EDGE_HZ, window=("kaiser", 8), fs=SR)
    return signal.oaconvolve(heard, lowpass[None], "same")


dry = scene()
out = record(dry)
int16_out(out)
```